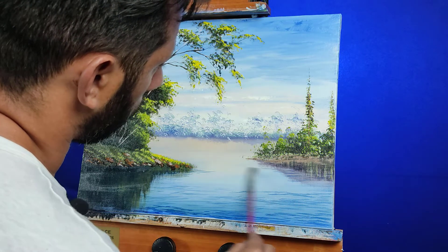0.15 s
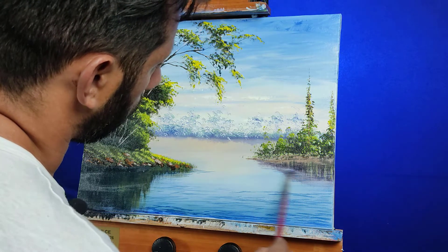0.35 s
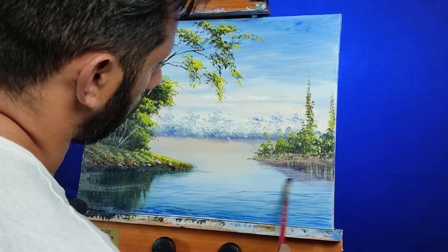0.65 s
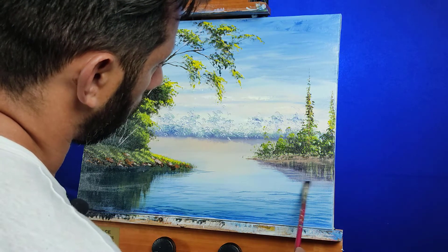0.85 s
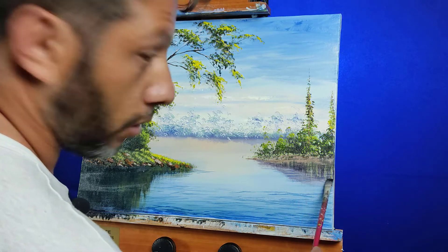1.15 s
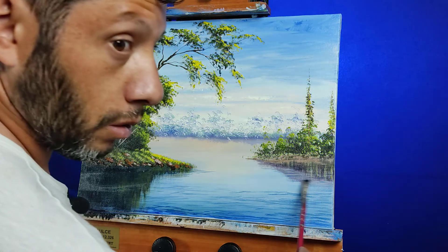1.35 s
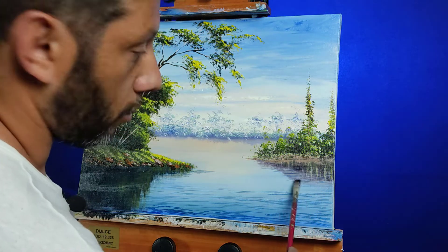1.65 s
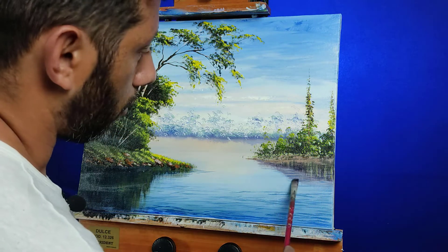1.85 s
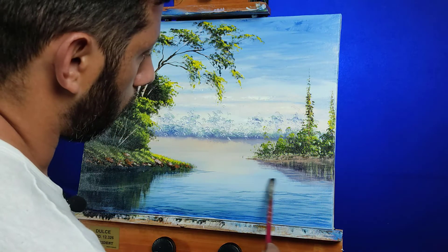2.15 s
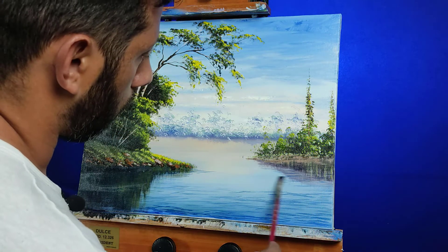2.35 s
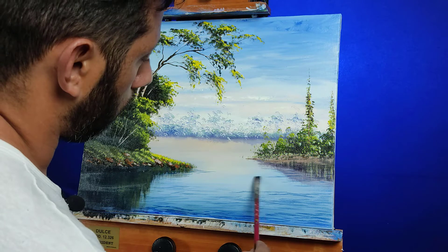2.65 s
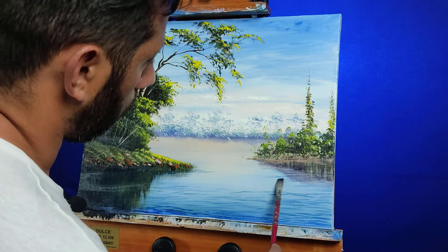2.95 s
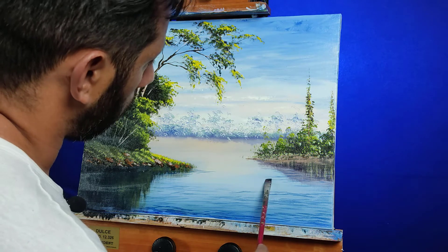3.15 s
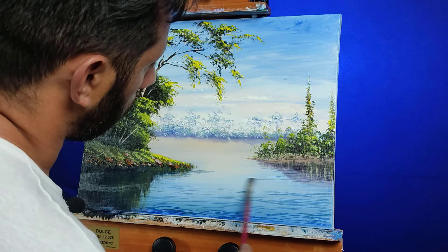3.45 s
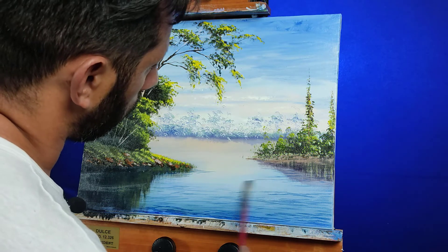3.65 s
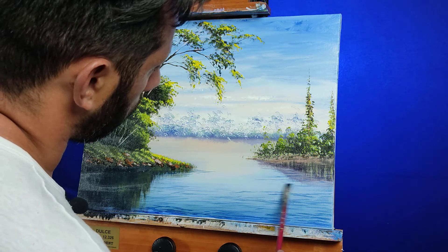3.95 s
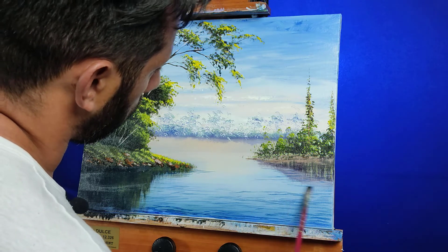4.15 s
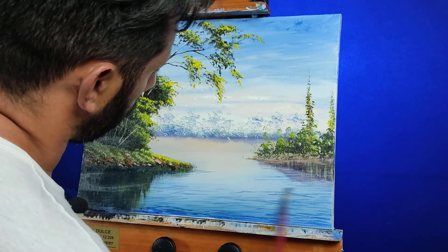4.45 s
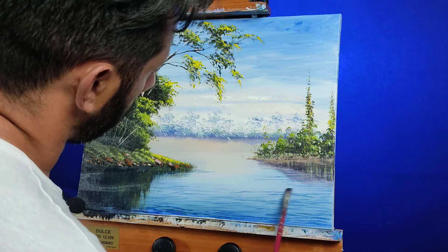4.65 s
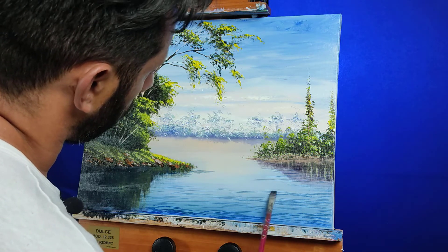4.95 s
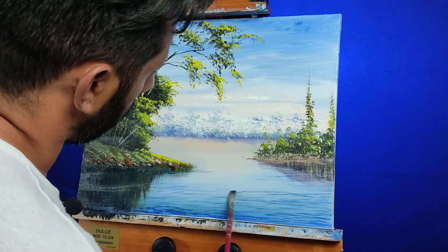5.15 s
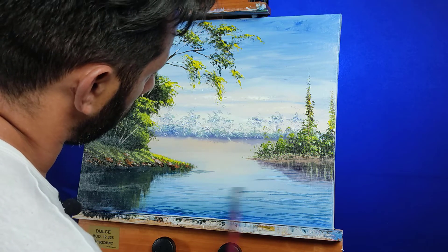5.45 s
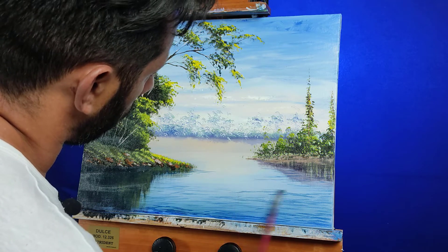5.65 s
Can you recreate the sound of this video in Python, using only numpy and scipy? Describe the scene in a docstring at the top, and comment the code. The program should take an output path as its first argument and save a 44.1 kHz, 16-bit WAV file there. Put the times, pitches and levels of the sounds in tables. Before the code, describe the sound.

A small bristle brush scratches in quick, short, dry strokes across stretched canvas in a quiet room with a low ventilation hum.

```python
"""In a quiet room, a small bristle brush works in quick short strokes across a stretched canvas.
Noise and random snaps make the bristles' tiny ticks and scrape, the cloth's rasp and the tuft's faint ring.
Jolts, short squeaks and tiny cracks join some strokes; random echoes that die away make the room's tail.
Filtered noise makes the ventilation, deep rumble and drone, which swells at times; a wavering sine hums."""
import sys
import numpy as np
from scipy import signal
from scipy.fft import rfft, irfft, next_fast_len
from scipy.io import wavfile
from scipy.ndimage import uniform_filter1d

SR = 44100
rng = np.random.default_rng(int(sys.argv[2]) if len(sys.argv) > 2 else 0)


def to_wav(sig):
    """Store sig (one row per channel, or 1-D mono) as 16-bit WAV at the path in sys.argv[1].

    Samples outside -1..1 are clipped; the rate is SR.
    """
    pcm = np.clip(np.atleast_2d(sig), -1, 1) * 32767
    pcm = np.round(pcm).astype(np.int16)
    wavfile.write(sys.argv[1], SR, pcm.T)  # frames by channels


N = 255339   # length in samples
TIME = np.arange(N) / SR
FREQS = np.maximum(np.arange(N // 2 + 1) * SR / N, 1)

# Spectrum tables give relative level per Hz of bandwidth; the sound is scaled afterwards.
# ventilation noise: (f/Hz, level/dB)
AIR_SPECTRUM = [(10, 7), (22, -2), (42, -8), (62, -5.5), (85, -11), (180, -13.5), (330, -17.5),
                (750, -23.5), (1500, -31.5), (3200, -41), (5000, -46), (8000, -56), (9600, -46.5),
                (10300, -50), (11500, -72)]
# how alike left and right are in the background: (f/Hz, likeness/1)
LEFT_RIGHT_LIKENESS = [(30, 0.66), (60, 0.6), (130, 0.9), (290, 0.73), (630, 0.39), (1400, 0.078),
                       (5000, 0.028)]
# deepest rumble over time, before RUMBLE_GAIN_DB: (t/s, level/dB)
RUMBLE_LEVELS = [(0.0, -51), (0.9, -54.5), (1.4, -55), (1.75, -56.5), (2.05, -51), (2.6, -53), (3.0, -52),
                 (3.5, -54), (3.95, -59), (4.25, -47), (4.42, -56), (4.75, -47.5), (5.2, -47.5), (5.5, -50),
                 (5.79, -56.5)]
# low room resonances, before the drone's slow changes: (f/Hz, nominal width/Hz, level/dB)
ROOM_RESONANCES = [(60.8, 10, -65.5), (72.2, 6.8, -67.5), (109.75, 3.9, -65), (121.1, 6.1, -62),
                   (153.9, 6.2, -64.5), (210.5, 12.5, -68.5), (238.5, 5.3, -72.5), (307.2, 4.1, -78.5)]
# slow changes of the whole drone: (t/s, gain/dB)
DRONE_GAINS = [(0, 3), (.25, 5), (.6, 0.5), (1.1, 1), (1.6, -1.5), (2.2, 2), (2.8, 2), (3.3, -2.5),
               (3.9, 0), (4.7, -6), (5.15, 0.5), (5.79, -2.5)]
# brief low swells: (start t/s, length/s, f/Hz, level/dB before the swell's bell shape)
DRONE_SWELLS = [(1.352, 0.27, 62, -56), (1.757, 0.32, 143.2, -56), (1.95, .16, 215, -60),
                (3.25, .7, 217.6, -66.5)]
# brush strokes; levels hold before pressure, grip and echo: (start t/s, length/s, scratch level/dB,
# scrape level/dB, ring of the bent tuft f/Hz, ring level/dB, brightness/dB per octave)
BRUSH_STROKES = [(0.003, 0.05, -46.5, -66, 3430, -65, -5), (0.207, 0.069, -45.5, -56, 2240, -67, -0.5),
                 (0.317, 0.061, -52, -65, 2330, -73, -4.5), (0.533, 0.069, -59, -71, 2270, -75, 3),
                 (0.606, 0.036, -55.5, -72, 2340, -77, 3), (.733, 0.059, -55.5, -82, 2400, -73, 3),
                 (0.795, 0.041, -56, -80, 3130, -72, -3), (0.933, 0.07, -53, -67.5, 2210, -78, 2),
                 (1.066, 0.015, -61.5, -73, 2300, -87, -9), (1.112, 0.056, -51.5, -61.5, 2380, -90, -1),
                 (1.323, 0.068, -46, -51, 2450, -63.5, 8), (1.574, 0.04, -56.5, -65, 2300, -72, -2),
                 (1.739, 0.011, -61.5, -65, 2332, -89, -5), (1.769, 0.058, -48, -53, 2230, -68.5, 0.5),
                 (1.969, 0.044, -52, -75, 2340, -68.5, -5), (2.195, 0.075, -46.5, -54.5, 2320, -68, 0.5),
                 (2.417, .1, -45.5, -50.5, 2040, -68, 1), (2.623, 0.063, -46.5, -61, 2410, -69.5, -2.5),
                 (2.773, 0.074, -47, -50.5, 2250, -66.5, 4), (2.941, 0.095, -46.5, -52, 2370, -69, 2),
                 (3.115, 0.11, -46, -55.5, 2750, -70.5, 0.5), (3.394, 0.038, -67.5, -99, 2347, -88, -1),
                 (3.501, 0.074, -45.5, -57.5, 2300, -82, -0.5), (3.756, 0.037, -74, -88, 2270, -88, 5),
                 (3.815, 0.042, -52.5, -69, 3044, -74, 0), (3.877, 0.12, -47.5, -58.5, 2340, -65, -2.5),
                 (4.026, 0.049, -55.5, -65, 3080, -77, 0), (4.084, 0.086, -55, -66.5, 3100, -78, 1.5),
                 (4.241, 0.13, -44.5, -47, 2250, -67.5, 4.5), (4.607, 0.11, -44, -46, 2430, -58.5, -3.5),
                 (4.745, .12, -49, -60, 2550, -73, -1), (4.883, .14, -44.5, -50.5, 2740, -60.5, -1),
                 (5.177, 0.051, -46.5, -58, 2960, -64.5, -2.5), (5.385, 0.071, -45, -49, 2490, -69, -2.5),
                 (5.518, 0.077, -49, -62, 2380, -60.5, -1), (5.567, .12, -44.5, -48.5, 2230, -64.5, -3),
                 (5.774, 0.037, -55, -75, 2280, -79, -4)]
# bristle scratch: (f/Hz, left level/dB, right level/dB)
SCRATCH_SPECTRUM = [(1530, -19.5, -21), (2980, -24, -31), (3870, -12.5, -16.5), (4940, -14.5, -12),
                    (5750, -12, -6), (7170, -5.5, 3), (8200, 3.5, -6), (8770, 4, -22), (9600, -5.5, -29),
                    (10580, -16.5, -19.5), (10900, -72, -62), (15400, -60, -71)]
# coarse scrape of bristles pressed on the weave: (f/Hz, level/dB)
SCRAPE_SPECTRUM = [(900, -19), (1900, -8.5), (2300, -9.5), (2900, -5.5), (3500, -5.5), (4700, -3.5),
                   (6000, 1), (9000, -5), (13000, -43)]
# rasp of the stretched cloth: (f/Hz, level/dB)
CLOTH_SPECTRUM = [(200, 3.5), (450, 11), (850, 9), (1200, 3), (1650, 4.5), (2000, -26), (3500, -27),
                  (11000, -44)]
# highest hiss of the strokes: (f/Hz, level/dB)
HISS_SPECTRUM = [(8000, -31), (10000, 2.5), (11000, -0.5), (12500, -8.5), (13600, -8.5), (15000, -30)]
# the tuft bumps over the threads: (start t/s, length/s, level/dB before pressure and echo)
THREAD_DRAGS = [(0.007, 0.044, -64), (0.212, 0.042, -59.5), (1.783, 0.053, -68.5), (2.208, 0.044, -73),
                (2.44, 0.042, -69), (2.635, 0.055, -65), (3.503, 0.061, -65.5), (4.624, 0.1, -63),
                (4.924, 0.12, -66.5), (5.187, 0.046, -62), (5.399, 0.038, -60.5), (5.6, 0.057, -63)]
# jolts of the cloth: (f/Hz, level/dB)
JOLT_SPECTRUM = [(400, -7), (750, 8.5), (1200, 5), (1700, 9), (2100, -38), (5000, -36)]
# the tuft judders on the weave: (start t/s, length/s, f/Hz, level/dB before pressure, pan and echo)
TUFT_SQUEAKS = [(0.215, 0.047, 800, -58.5), (0.217, 0.042, 1560, -61.5), (1.062, 0.014, 4510, -66),
                (1.125, 0.017, 2340, -64.5), (4.258, 0.075, 2290, -63), (4.967, 0.012, 2770, -65),
                (5.53, 0.04, 2480, -59.5), (5.562, 0.022, 2010, -55.5)]
# the tuft lands hard or a stiff bristle flicks free: (t/s, nominal peak level/dB before echo)
BRISTLE_FLICKS = [(0.2136, -23.5), (0.573, -41), (.7455, -41), (.7657, -25.5), (0.819, -31), (0.943, -24),
                  (1.07, -36), (1.333, -21), (1.5835, -31), (1.6053, -34.5), (1.7785, -28), (1.9895, -24),
                  (2.208, -17), (2.223, -22), (2.423, -31), (2.6375, -28), (2.8104, -26), (3.1212, -20),
                  (3.1928, -21), (3.8516, -22), (4.102, -27), (4.265, -24), (4.6107, -36), (4.674, -14),
                  (4.9216, -19), (5.178, -23.5), (5.225, -26), (5.391, -17.5)]

AIR_DB, HUM_HZ, HUM_DB = -51.5, 117.8, -67.5
RUMBLE_HZ, RUMBLE_WIDTH_HZ, RUMBLE_GAIN_DB, RUMBLE_EVEN_S = 29.8, 4.15, 2, .25
SWELL_WIDTH_HZ, SQUEAK_WIDTH_HZ, TUFT_WIDTH_HZ = 5, 150, 197   # nominal widths, as used by band()
RISE_SHARE, PRESSURE_WIDTH = 0.5, 0.88   # part of a stroke before the peak; stretch of its swell
# the longest bristles touch first: level at the landing, and its time to grow
GRAZE_DB, GRAZE_S, LANDING_S = -20, 0.013, .0055
# small bundles let go together: rate before jitter, decay, share of the scratch's power
CATCH_PER_S, CATCH_S, CATCH_SHARE = 520, 0.0006, 0.43
BRIGHT_PIVOT_HZ = 7500
SPLAY_DB, SPLAY_HZ, SPLAY_S = 3.2, 130, .045   # random spread, spacing and time step of the patches
FIRM_STROKE_DB = -42.5   # scratch level that counts as firm
# on a firm stroke, before pressure and pan; dB gained per dB of scratch level
CLOTH_DB, CLOTH_GROWTH = -65.5, 0.14
HISS_DB, HISS_GROWTH = -53, 4.03
SCRAPE_POWER = 0.58   # extra power of the pressure, so the scrape comes in later than the scratch
ROOM_T60_S, TAIL_S, TAIL_CUT_HZ = 0.38, .5, 11000   # time to fall 60 dB, tail length, top limit
CUTOFF_HZ = 15200


def from_db(db):
    """Turn decibels into the factor that multiplies a sound."""
    return 10 ** (np.asarray(db) / 20)


def rms_one(x):
    """Scale to an average strength (rms) of 1."""
    return x / np.sqrt(np.mean(x ** 2) + 1e-20)


def add(out, at, x):
    """Mix a sound in from a given sample on."""
    out[:, at:at + x.shape[1]] += x[:, :N - at]


def pan(db):
    """Gains that raise the left side and lower the right by the same number of decibels."""
    return from_db([[db], [-db]])


def over_hz(rows):
    """Join up each column of a table along pitch, where every octave is equally wide."""
    hz, *columns = np.transpose(rows)
    return np.array([np.interp(np.log(FREQS), np.log(hz), c) for c in columns])


def over_time(rows):
    """Join up the levels of a table along time and turn them into gains."""
    return from_db(np.interp(TIME, *np.transpose(rows)))


def colour(x, rows):
    """Weight the frequencies of a sound by a table, as a body that favours some pitches; rms 1."""
    return rms_one(irfft(rfft(x) * from_db(over_hz(rows)), N))


def resonate(x, hz, width_hz):
    """Ring near one frequency like a struck body; gain 1 at the peak."""
    r = np.exp(-np.pi * width_hz / SR)
    top = np.array([1, 0, -1]) * (1 - r * r) / 2
    return signal.lfilter(top, [1, -2 * r * np.cos(2 * np.pi * hz / SR), r * r], x)


def band(x, hz, width_hz):
    """Keep a narrow band by two equal resonances in a row, each twice the nominal width; rms 1."""
    once = resonate(x, hz, 2 * width_hz)
    return rms_one(resonate(once, hz, 2 * width_hz))


def drift(rate_hz):
    """Wander smoothly at random, as slowed-down noise; rms 1."""
    return rms_one(irfft(rfft(rng.standard_normal(N)) / (1 + (FREQS / rate_hz) ** 2), N))


def stereo_noise(likeness):
    """Even hiss that left and right share in part: 1 is the same, 0 is unrelated."""
    alike = np.clip(likeness, -1, 1)
    mid, side = rfft(rng.standard_normal((2, N)))
    shared = np.sqrt(1 + alike) * mid
    opposite = np.sqrt(1 - alike) * side * [[1], [-1]]
    return rms_one(irfft(shared + opposite, N))


def background():
    """Ventilation noise, its deep rumble, the low room resonances that it stirs, and the mains hum."""
    air = from_db(AIR_DB) * colour(stereo_noise(over_hz(LEFT_RIGHT_LIKENESS)), AIR_SPECTRUM)
    draught = stereo_noise(over_hz(LEFT_RIGHT_LIKENESS))
    deep = band(draught, RUMBLE_HZ, RUMBLE_WIDTH_HZ)
    # even out chance swells, so that the table sets the level
    power = uniform_filter1d(np.mean(deep ** 2, axis=0), int(RUMBLE_EVEN_S * SR))
    deep = deep / np.sqrt(power + 1e-9)
    rumble = from_db(RUMBLE_GAIN_DB) * over_time(RUMBLE_LEVELS) * deep
    drone = sum(from_db(db) * band(draught, hz, width) for hz, width, db in ROOM_RESONANCES)
    wobble = 0.11 * drift(0.69)   # radians
    hum = from_db(HUM_DB) * rms_one(np.sin(2 * np.pi * HUM_HZ * TIME + wobble))
    return air + hum + rumble + drone * over_time(DRONE_GAINS)


def contact(start, length):
    """A few bristles graze, the brush lands, pressure swells and fades: samples used, and pressure."""
    rise, fall = length * RISE_SHARE, length * (1 - RISE_SHARE)
    top = start + rise
    first = max(int((top - 2 * rise - 2 * GRAZE_S) * SR), 0)
    on = slice(first, int((top + 2 * fall) * SR))
    since = TIME[on] - top
    landed = .5 + .5 * np.tanh((TIME[on] - start) / LANDING_S + 1)
    graze = from_db(GRAZE_DB) * np.exp(-abs(TIME[on] - start) / GRAZE_S)
    bell = np.exp(-(since / np.where(since < 0, rise, fall) / PRESSURE_WIDTH) ** 2)
    return on, graze + landed * bell


def slips(per_s, spread_db, rub_db, likeness):
    """Single bristles snap off the threads at random, over the smooth rub of the whole tuft."""
    sizes = from_db(spread_db * np.minimum(rng.exponential(1, N), 4)) * rng.choice([-1, 1], N)
    snaps = sizes * (rng.random(N) < per_s / SR)
    aim = 1 + .5 * rng.standard_normal((2, N))   # each snap radiates unevenly
    return rms_one(rms_one(snaps * aim) + from_db(rub_db) * stereo_noise(likeness))


def bundles(jitter, spread_db):
    """Bristle bundles hop between threads unevenly and chop the scratch into flecks: gain of rms 1."""
    gap, size = rng.standard_normal((2, N // 20))
    at = (np.cumsum(np.exp(jitter * gap)) / CATCH_PER_S * SR).astype(int)
    inside = at < N
    hops = np.zeros(N)
    hops[at[inside]] = from_db(spread_db * np.clip(size[inside], -2, 2))
    flecks = rms_one(signal.lfilter([1], [1, -np.exp(-1 / (CATCH_S * SR))], hops))
    return np.sqrt(1 - CATCH_SHARE + CATCH_SHARE * flecks ** 2)


def tilt(x, db_per_octave):
    """Each stroke has its own brightness: tilt its scratch brighter or duller around the pivot."""
    size = next_fast_len(x.shape[1])
    hz = np.arange(size // 2 + 1) * SR / size
    octaves = np.log2(np.clip(hz / BRIGHT_PIVOT_HZ, .5, 2))   # at most one octave either way
    return irfft(rfft(x, size) * from_db(db_per_octave * octaves), size)[:, :x.shape[1]]


def splay(x, patchy_db, patch_hz):
    """Dragged bristles keep regrouping, so the frequencies that they favour shift during a stroke."""
    length = x.shape[1]
    size = next_fast_len(length)
    place = np.arange(size // 2 + 1) * SR / size / patch_hz
    spectrum, travel = rfft(x, size), TIME[:length] / SPLAY_S
    out = np.zeros_like(x)
    for k in range(int(travel[-1]) + 2):
        knots = rng.standard_normal(256) + .5 * rng.standard_normal((2, 256))
        patches = np.array([np.interp(place, np.arange(256), row) for row in knots])
        gain = from_db(patchy_db * patches)
        grouped = irfft(spectrum * gain / np.sqrt(np.mean(gain ** 2)), size)[:, :length]
        out += np.maximum(1 - abs(travel - k), 0) * grouped   # crossfade to the next grouping
    return out


def brush(grip_db, grip_hz, clump_db, clump_hz, hiss_pan_db, tuft_pan_db):
    """Bristles scratch and scrape, cloth rasps, the tuft rings; high hiss is far stronger in loud strokes."""
    ticks = slips(per_s=610, spread_db=3.5, rub_db=7.0, likeness=0.16)
    scratch = colour(ticks * bundles(jitter=.5, spread_db=1.5), SCRATCH_SPECTRUM)
    clumps = from_db(clump_db * np.tanh(drift(clump_hz)))
    scrape = colour(slips(per_s=650, spread_db=0.0, rub_db=5.0, likeness=0.25) * clumps, SCRAPE_SPECTRUM)
    rasp = colour(slips(per_s=1400, spread_db=1.5, rub_db=3.5, likeness=0.94), CLOTH_SPECTRUM)
    snaps = slips(per_s=600, spread_db=2.5, rub_db=2.0, likeness=.2)
    hiss = colour(snaps, HISS_SPECTRUM) * pan(hiss_pan_db)
    catches = slips(per_s=600, spread_db=1.5, rub_db=-1.0, likeness=0.18)
    grip = from_db(grip_db * drift(grip_hz))   # varies with weave and wet paint
    out = np.zeros((2, N))
    for start, length, db, scrape_db, tuft_hz, tuft_db, bright_db in BRUSH_STROKES:
        on, pressure = contact(start, length)
        above_firm_db = db - FIRM_STROKE_DB
        pressed = from_db(CLOTH_DB + CLOTH_GROWTH * above_firm_db) * rasp[:, on]
        pressed += from_db(HISS_DB + HISS_GROWTH * above_firm_db) * hiss[:, on]
        tuft = from_db(tuft_db) * band(catches[:, on], tuft_hz, TUFT_WIDTH_HZ) * pan(tuft_pan_db)
        friction = from_db(db) * tilt(scratch[:, on], bright_db)
        friction += pressure ** SCRAPE_POWER * from_db(scrape_db) * scrape[:, on]
        friction += pressure * pressed
        stroke = splay(friction, patchy_db=SPLAY_DB, patch_hz=SPLAY_HZ) + tuft
        add(out, on.start, heard(pressure * grip[on] * stroke))
    return out


def from_the_left(x, lag_s):
    """The sound reaches the right side a little later."""
    size = next_fast_len(x.shape[1])
    hz = np.arange(size // 2 + 1) * SR / size
    late = irfft(rfft(x[1], size) * np.exp(-2j * np.pi * hz * lag_s), size)
    return np.array([x[0], late[:x.shape[1]]])


def room(x, delay_s, early_db, early_t60_s):
    """Close reflections off easel and painter, then the room's dying tail, limited at the top."""
    t = TIME[:int(TAIL_S * SR)]
    decay = from_db(-60 * t / ROOM_T60_S) + from_db(early_db - 60 * t / early_t60_s)
    echoes = rng.standard_normal((2, len(t))) * decay * (t > delay_s)
    echoes /= np.sqrt(np.sum(echoes ** 2, axis=1, keepdims=True))
    echoes = signal.sosfilt(signal.butter(8, TAIL_CUT_HZ, fs=SR, output="sos"), echoes)
    return signal.fftconvolve(x, echoes, axes=1)


def heard(x):
    """Direct sound plus echo; each call draws a new pattern of reflections, as for another spot."""
    out = from_db(-1.0) * room(x, delay_s=.003, early_db=5.0, early_t60_s=0.022)
    add(out, 0, from_the_left(x, lag_s=.00004))
    return out


def drags():
    """The tuft bumps over the threads in coarse jolts that shake the cloth."""
    jolts = colour(slips(per_s=380, spread_db=-2.0, rub_db=-15.0, likeness=0.56), JOLT_SPECTRUM)
    out = np.zeros((2, N))
    for start, length, db in THREAD_DRAGS:
        on, pressure = contact(start, length)
        out[:, on] += from_db(db) * pressure * rms_one(jolts[:, on])
    return out


def squeaks(pan_db):
    """Bristles that stick and slip together ring in a narrow band."""
    friction = slips(per_s=750, spread_db=1.5, rub_db=0.0, likeness=0.13)
    out = np.zeros((2, N))
    for start, length, hz, db in TUFT_SQUEAKS:
        on, pressure = contact(start, length)
        out[:, on] += from_db(db) * pressure * band(friction[:, on], hz, SQUEAK_WIDTH_HZ)
    return out * pan(pan_db)


def flicks(t60_s, crest_db):
    """A few bristles let go together: a tiny dying crack with the colour of the scratch."""
    kicks = np.zeros(N)
    for s, peak_db in BRISTLE_FLICKS:
        kicks[int(s * SR)] = from_db(peak_db - crest_db)   # leaves headroom for the noise peaks
    fade = signal.lfilter([1], [1, -from_db(-60 / (t60_s * SR))], kicks + 1e-18)
    cracks = rng.standard_normal((2, N)) * fade
    return colour(cracks, SCRATCH_SPECTRUM) * np.std(cracks)


def swells():
    """Now and then the drone swells in one narrow band, shaped like a bell."""
    draught = stereo_noise(over_hz(LEFT_RIGHT_LIKENESS))
    out = np.zeros((2, N))
    for start, length, hz, db in DRONE_SWELLS:
        bell = np.exp(-(2 * (TIME - start) / length - 1) ** 2)
        swell = rms_one(bell * band(draught, hz, SWELL_WIDTH_HZ))
        out += from_db(db) * swell * np.sqrt(np.mean(bell ** 2))
    return out


def scene():
    """The brush and its echo over the room's background."""
    strokes = brush(grip_db=0.14, grip_hz=76, clump_db=4.0, clump_hz=110, hiss_pan_db=7.5, tuft_pan_db=1.5)
    snags = drags() + squeaks(pan_db=3.0) + flicks(t60_s=0.0069, crest_db=18.0)
    return background() + strokes + heard(snags)[:, :N] + swells()


def record(dry):
    """Cut the top steeply."""
    return signal.sosfilt(signal.ellip(10, .1, 80, CUTOFF_HZ, fs=SR, output="sos"), dry)


dry = scene()
out = record(dry)
to_wav(out)
```